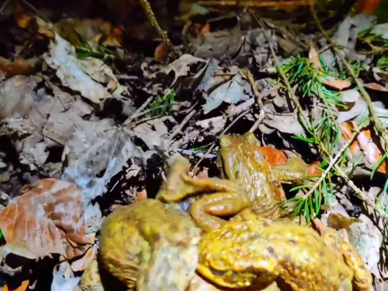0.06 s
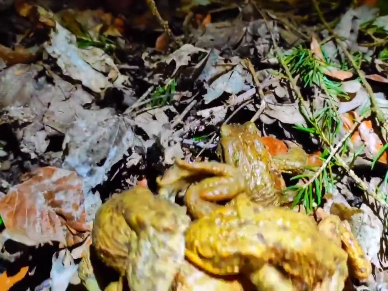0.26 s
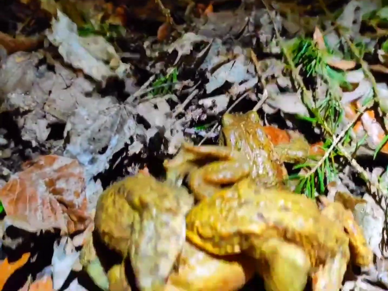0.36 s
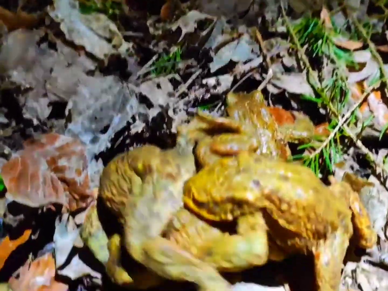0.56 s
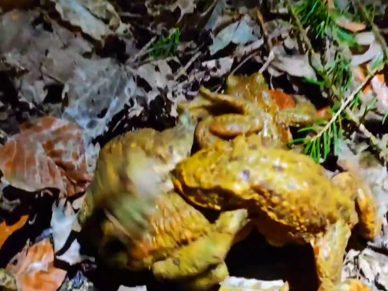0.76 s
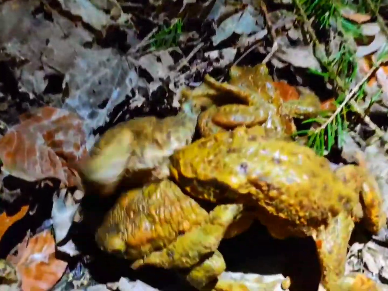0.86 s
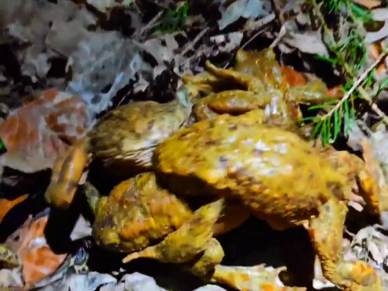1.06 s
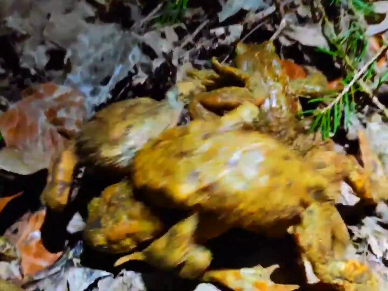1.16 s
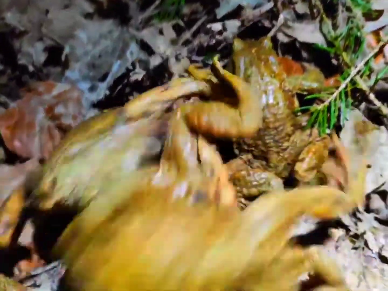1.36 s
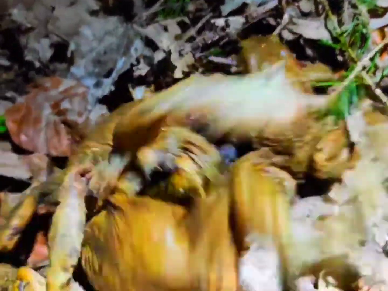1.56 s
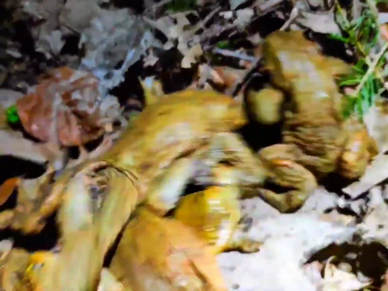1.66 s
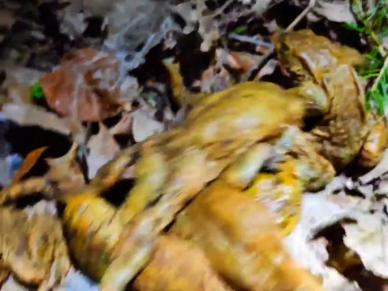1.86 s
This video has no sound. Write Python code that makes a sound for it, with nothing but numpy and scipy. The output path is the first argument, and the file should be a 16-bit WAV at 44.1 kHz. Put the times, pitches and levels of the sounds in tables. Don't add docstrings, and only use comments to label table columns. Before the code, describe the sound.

Close stereo phone pickup on a quiet night forest floor: sparse leaf cracks, low thumps and a sharp pop on the right, light rustling, then vigorous leaf scrambling with a single brief toad peep.

```python
import sys
import numpy as np
from scipy import signal
from scipy.fft import rfft, irfft, next_fast_len
from scipy.io import wavfile
from scipy.ndimage import uniform_filter1d, map_coordinates

SR = 44100
rng = np.random.default_rng(int(sys.argv[2]) if len(sys.argv) > 2 else 0)


def amplitude_ratio(level_db):
    exponent = np.asarray(level_db, float) / 20
    return 10 ** exponent


def unload_audio(sound):
    columns = np.transpose(np.atleast_2d(sound))
    steps = np.round(np.clip(columns, -1, 1) * 32767)
    wavfile.write(sys.argv[1], SR, steps.astype(np.int16))


N = 85995


def unit(x):
    return x / np.sqrt(np.mean(x ** 2) + 1e-20)


def along(points, hz):
    f, v = np.transpose(points)
    return np.interp(np.log(hz + 1), np.log(f + 1), v)


def curve(points):
    s, v = np.transpose(points)
    return np.interp(np.arange(N) / SR, s, v)


def wobble(rate_hz):
    knots = rng.standard_normal(int(N * rate_hz / SR) + 4)
    return map_coordinates(knots, [np.arange(N) * rate_hz / SR])


def filtered(x, response):
    m = next_fast_len(N + SR // 2)
    return irfft(rfft(x, m) * response(np.fft.rfftfreq(m, 1 / SR)), m)[..., :N]


def spread(pair, spectrum, alike):
    def mid_side(hz):
        turn = np.arccos(np.clip(along(alike, hz), -1, 1)) / 2
        return amplitude_ratio(along(spectrum, hz)) * [np.cos(turn), np.sin(turn)]
    mid, side = filtered(pair, mid_side)
    return unit(np.array([mid + side, mid - side]))


def sides(pan_db):
    return amplitude_ratio(np.array([pan_db / 2, -pan_db / 2]))


def step_up(t, at_s, rise_s):
    return (1 + np.tanh((t - at_s) / rise_s)) / 2


# (frequency [Hz], density [dB per Hz])
AIR_SPECTRUM = [(8.8, -2.5), (20, -8.5), (40, -3), (75, -11.5), (150, -21.5), (334, -26), (600, -36),
                (780, -47.5), (1320, -120)]
# (frequency [Hz], likeness [0..1])
AIR_ALIKE = [(20, .25), (35, .9), (100, .6), (300, .5), (640, 0.2), (3000, .02)]
# (time [s], level [dB])
AIR_SWELL = [
    (0, 0),
    (.15, 2),
    (.5, 0),
    (.9, 1),
    (1.1, -0.5),
    (1.35, -1),
    (1.6, -4),
    (1.8, -0.5),
    (1.95, 0.5),
]
# (frequency [Hz], density [dB per Hz])
HISS_SPECTRUM = [(250, -3), (700, -1), (1500, -9.5), (4000, -14.5), (8000, -10.5), (10300, -20.5),
                 (13000, -15), (15800, -14.5)]
AIR_DB, HISS_DB = -49, -62


def night():
    gusts = rng.standard_normal((2, N)) * amplitude_ratio(1.4 * wobble(6.17))
    air = spread(gusts, AIR_SPECTRUM, AIR_ALIKE)
    hiss_alike = [(300, 0.19), (2000, 0.0091), (8000, 0.49)]
    hiss = spread(rng.standard_normal((2, N)), HISS_SPECTRUM, hiss_alike)
    return amplitude_ratio(AIR_DB + curve(AIR_SWELL)) * air + amplitude_ratio(HISS_DB) * hiss


# (frequency [Hz], level [dB])
PORT = [(4500, -22.5), (6000, -17.5), (7000, -4.5), (8350, 0.7), (9200, -9.5), (10500, -23.5)]
# (frequency [Hz], density [dB per Hz])
LEAF = [(200, -4.5), (400, -6), (1200, -5.5), (3000, -4.5), (5500, -1), (10000, -7.5), (13000, -4),
        (15800, -8.5)]
# (time [s], peak [dB], broad part [dB], left-right [dB])
SNAPS = [(0.0833, -46.5, -7, 16.0), (0.1222, -47, -6, 16.0), (0.1528, -48.5, -8, 16.5),
         (0.1733, -46.5, -7.5, 15.0), (0.2887, -44.5, -5, 19.0), (0.413, -36.5, -10.5, 8),
         (0.458, -53, -6, 1), (0.618, -41.5, -8, -6.5), (0.6389, -31.5, -18, -13), (0.7414, -36, -12, -2),
         (0.7896, -36.5, -5, 1), (0.828, -50, -0.5, 11), (0.9488, -46.5, -26, -11),
         (1.0321, -43.5, -9.5, -3), (1.0939, -31.5, -14.5, 1), (1.1728, -30, -12, -13),
         (1.2307, -24, -31, -6.5), (1.2364, -20, -21, 6), (1.3125, -33, -4, -8), (1.3877, -25, -24, -13),
         (1.423, -46, -15, -12), (1.4875, -21.5, -16, -4.5), (1.5733, -26, -20, -2.0),
         (1.6202, -26, -21, 9), (1.6384, -22, -30, 9), (1.8023, -45, -7, -11.5), (1.8196, -25.5, -12, -4),
         (1.8579, -26.5, -30, 0), (1.924, -22, -25, 16)]
# (time [s], peak [dB], left-right [dB])
MORE_SNAPS = [(0.4695, -47, -6.5), (0.526, -49, -5.0), (0.583, -45, -5.0), (0.623, -38, -4.5),
              (0.841, -41.5, -6), (0.8644, -52, 0.0), (0.8859, -45.5, -1.5), (0.9286, -53, -9),
              (1.0114, -52, -2.0), (1.1168, -38, -2.0), (1.1785, -29.5, -11), (1.207, -32, -10),
              (1.2115, -30, -5.5), (1.2444, -26, 3), (1.4451, -40, -13), (1.4592, -23.5, -3), (1.5232, -32, 0.0),
              (1.5579, -30, -3.5), (1.5824, -27, -2.0), (1.597, -28, 2), (1.6052, -32, 2), (1.6127, -31, 4),
              (1.6314, -23.5, 5), (1.6835, -28, 5), (1.747, -36, -0.5), (1.87, -34, -1.0), (1.884, -29, 0.0),
              (1.919, -27, 3.5), (1.9273, -28, 2.5)]
# (time [s], level [dB], pitch [Hz], left-right [dB])
THUDS = [(0.1247, -46.5, 1050, 9), (.173, -50.5, 950, 9), (0.4599, -42, 6500, -11),
         (0.49, -48, 2140, -19.5), (0.506, -53.5, 2250, -16), (.757, -54.5, 1680, -17),
         (1.423, -36.5, 4500, 9), (1.489, -45.5, 398, -1), (1.6, -42, 1590, -14), (1.64, -40.5, 1280, -10),
         (1.769, -45, 2680, -18), (1.803, -48, 1820, -2)]
MORE_SNAPS_BROAD_DB = -19
SNAP_T60_S, SNAP_RISE_S = .008, .001
THUD_CYCLES, THUD_LEAST_S = 1, .0002


def snaps():
    t = np.arange(SR // 20) / SR
    whistle, broad, thuds = np.zeros((3, 2, N + SR))
    cracks = [*SNAPS, *[(s, db, MORE_SNAPS_BROAD_DB, pan_db) for s, db, pan_db in MORE_SNAPS]]
    noises = rng.standard_normal((len(cracks), 4, len(t)))
    burst = amplitude_ratio(-60 * t / SNAP_T60_S) * (1 - np.exp(-t / SNAP_RISE_S))
    for (s, db, broad_db, pan_db), noise in zip(cracks, noises):
        shape = amplitude_ratio(db) * burst * sides(np.clip(pan_db, -10, 10))[:, None]
        span = slice(round(s * SR), round(s * SR) + len(t))
        whistle[:, span] += shape * (noise[0] + 0.12 * noise[1:3])
        broad[:, span] += shape * amplitude_ratio(broad_db) * (noise[3] + noise[1:3])
    for s, db, hz, pan_db in THUDS:
        u = t / max(THUD_CYCLES / hz / 2, THUD_LEAST_S)
        ring = np.e * u * np.exp(-u) * np.sin(2 * np.pi * hz * t)
        span = slice(round(s * SR), round(s * SR) + len(t))
        thuds[:, span] += amplitude_ratio(db) * ring * sides(pan_db)[:, None]
    whistle = filtered(whistle[:, :N], lambda hz: amplitude_ratio(along(PORT, hz) + 11))
    broad = filtered(broad[:, :N], lambda hz: amplitude_ratio(along(LEAF, hz) + 12) * hz ** 2 / (hz ** 2 + 1500 ** 2))
    return whistle + broad + thuds[:, :N]


# (time [s], level [dB], rebound [Hz])
JERKS = [
    (.207, -36, 120),
    (.2225, -32, 170),
    (.2285, -29, 80),
    (.2685, -26.5, 100),
]
JERK_GROWS_S, JERK_DIES_S, JERK_SWELL = .009, .008, .6


def jerks():
    out = np.zeros(N)
    for s, db, hz in JERKS:
        u = np.arange(N) / SR - s
        after_s = np.clip(u, 0, None)
        late = after_s / JERK_DIES_S
        envelope = np.exp(np.clip(u, None, 0) / JERK_GROWS_S - late)
        rebound = np.e * JERK_SWELL * late - np.cos(2 * np.pi * hz * after_s)
        out += amplitude_ratio(db) * envelope * rebound
    return out


# (time [s], level [dB])
DRAG = [
    (.17, -58),
    (.205, -44),
    (.232, -42),
    (.29, -44),
    (.36, -41),
    (.43, -42),
    (.47, -60),
]
# (time [s], level [dB], rise [s])
SLIPS = [
    (.3318, -16, .0008),
    (.3361, -17, .0006),
    (.3395, -9.3, .0005),
]
# (time [s], level [dB], half width [s])
POPS = [(.33907, -.7, .00013), (.33891, -8.5, .00006), (.3388, -18, .0004), (.3331, -28, .0003),
        (.3345, -25, .001), (.3354, -26, .0002), (.348, -24, .00009), (.3487, -30, .00015),
        (.36055, -26, .00008), (.3641, -16.5, .00008), (.3684, -35, .00008)]
DRAG_HZ, SEALED_HZ = 80.6, 8500
PULL_S, PULL_DB, PULL_GROWS_S, LEAK_S = .3305, -12.6, .0065, .007
POP_POINT = 1.8
PEEL_S, PEEL_DB, PEEL_T60_S, PEEL_HZ = .347, -47, .2, 5500


def finger():
    t = np.arange(N) / SR

    def leak(s):
        return np.exp(-np.clip(t - s, 0, None) / LEAK_S)

    rub = filtered(rng.standard_normal(N), lambda hz: hz / (hz + 26) / (1 + (hz / DRAG_HZ) ** 3))
    drag = amplitude_ratio(curve(DRAG)) * unit(rub)
    pull = -amplitude_ratio(PULL_DB) * np.exp(-np.clip(PULL_S - t, 0, None) / PULL_GROWS_S) * leak(PULL_S)
    slips = sum(amplitude_ratio(db) * step_up(t, s, rise_s) * leak(s) for s, db, rise_s in SLIPS)
    pops = sum(-amplitude_ratio(db) * np.exp(-(np.abs(t - s) / half_s) ** POP_POINT) for s, db, half_s in POPS)
    rough = rng.standard_normal(N) * amplitude_ratio(3 * wobble(600))
    skin = unit(filtered(rough, lambda hz: hz / (hz + 300) / (1 + (hz / PEEL_HZ) ** 4)))
    t60_s = np.where(t > PEEL_S, PEEL_T60_S, PEEL_T60_S / 15)
    peel = amplitude_ratio(PEEL_DB - 60 * np.abs(t - PEEL_S) / t60_s) * skin
    pressure = drag + jerks() + pull + slips + pops + peel
    right = filtered(pressure, lambda hz: 1 / (1 + (hz / SEALED_HZ) ** 6))
    return np.array([np.zeros(N), right])


PATCH_DB = 2


def patchy(pair):
    z = signal.stft(pair, nperseg=256)[2]
    field = uniform_filter1d(rng.standard_normal(z.shape[1:]), size=7, axis=0)
    field = uniform_filter1d(field, size=7, axis=1)
    return signal.istft(z * amplitude_ratio(PATCH_DB * unit(field)), nperseg=256)[1][:, :N]


GRAINS_PER_S, GRAIN_HZ, GRAIN_CYCLES, GRAIN_SPREAD_DB = 1600, 8000, 2.5, 3.2


def crackle():
    at, side, u = rng.random((int(GRAINS_PER_S * N / SR), 3)).T
    hz = np.clip(GRAIN_HZ * np.exp(0.456 * rng.standard_normal(len(at))), 600, 15000)[:, None]
    t = np.arange(SR // 200) / SR
    size = amplitude_ratio(-GRAIN_SPREAD_DB * np.log(u + 1 / 50) + along(PORT, hz[:, 0]) / 2)[:, None]
    decay = np.exp(-t * hz / GRAIN_CYCLES) * (1 - np.exp(-t * hz))
    ring = size * np.sin(2 * np.pi * hz * t) * decay
    where = ((at * N).astype(int)[:, None] + np.arange(len(t))).ravel()
    gains = sides(20 * (side - .5))
    return unit(np.array([np.bincount(where, (ring * g[:, None]).ravel(), N + SR)[:N] for g in gains]))


# (time [s], length [s], level [dB], broad part [dB], left-right [dB])
SHOVES = [(0.328, 0.09, -68.5, 3, -8), (0.486, 0.044, -63.5, 5.5, -8), (0.536, 0.038, -66.5, 2, -2),
          (0.567, 0.037, -61, 1, -7), (0.619, 0.031, -57, 2.5, -6), (0.65, .032, -55.5, 2.5, -3),
          (0.696, 0.053, -69.5, 7.5, -3), (0.743, 0.025, -62, 6, -5), (0.773, 0.029, -60.5, 7, -4.5),
          (0.818, 0.027, -67.5, 6.5, -4), (0.862, 0.045, -75, -6, -8), (0.997, 0.21, -69, 3.5, -4),
          (1.064, 0.086, -60, 3, -2.5), (1.17, 0.053, -44, -0.5, -2.5), (1.221, 0.018, -40, -8, -7.5),
          (1.237, 0.046, -56, 8, 0), (1.292, 0.027, -46.5, 1.5, -2.5), (1.33, 0.039, -47.5, 2, -3.5),
          (1.369, 0.06, -43, -3.5, -3.5), (1.438, 0.032, -43, 0, -1), (1.483, 0.049, -42, -1, -1),
          (1.544, 0.087, -46, -2, -3), (1.596, 0.053, -41, -3, -1), (1.655, 0.056, -46.5, -0.5, -3),
          (1.708, 0.075, -49.5, -1.5, 0), (1.799, 0.014, -51, -4, 0), (1.814, 0.013, -43.5, -4.5, -4),
          (1.832, 0.029, -49, -5.5, -2), (1.859, 0.039, -44.5, -3, -0.5), (1.909, 0.046, -46.5, -1, -4)]
# (frequency [Hz], likeness [0..1])
LEAF_ALIKE = [(600, 0.19), (3000, 0.028), (6500, 0.097), (10000, 0.85), (15000, 0.26)]
SHOVE_RISE_S, SHOVE_FALL_DB_PER_S = 0.0086, 483
LEAF_DB, GRAIN_DB, CLUMP_DB = -1, -8, 1


def rustle():
    t = np.arange(N) / SR
    whistle_power, broad_power = np.zeros((2, 2, N))
    for s, length_s, db, broad_db, pan_db in SHOVES:
        fall_db = SHOVE_FALL_DB_PER_S * np.clip(t - s - length_s, 0, None)
        shape = amplitude_ratio(db - fall_db) * np.clip((t - s) / SHOVE_RISE_S, 0, 1) * sides(pan_db)[:, None]
        whistle_power += shape ** 2
        broad_power += (shape * amplitude_ratio(broad_db)) ** 2

    def clumpy_hiss(depth_db):
        clumps_db = CLUMP_DB * np.array([wobble(150), wobble(110)])
        return rng.standard_normal((2, N)) * amplitude_ratio(depth_db * wobble(59.57) + clumps_db)

    ports = spread(patchy(clumpy_hiss(1.9)), PORT, [(8000, 0.84)])
    whistle = np.sqrt(whistle_power) * (ports + amplitude_ratio(GRAIN_DB) * crackle())
    broad = np.sqrt(broad_power) * spread(patchy(clumpy_hiss(1.5)), LEAF, LEAF_ALIKE)
    return amplitude_ratio(LEAF_DB) * (whistle + broad)


# (time [s], level [dB])
CHIRP = [
    (1.2545, -60),
    (1.258, -37),
    (1.262, -32),
    (1.276, -32.5),
    (1.308, -29.5),
    (1.355, -30),
    (1.39, -35),
    (1.422, -43),
    (1.433, -62),
]
# (multiple [1], level re fundamental [dB], fade [dB per s])
OVERTONES = [(2, -29, -15), (3, -29, 70), (4, -22, 140), (5, -38, 60), (6, -26, 60), (7, -30, 60)]
CHIRP_HZ, ONSET_HZ, SETTLE_S = 1003, 135, .015
LIFT_HZ, LIFT_S, LIFT_WIDE_S = 52, 1.392, .017
OVERTONES_S, OVERTONES_RISE_S = 1.263, .002
BRIGHTEN, TREMBLE = .1, .0025
CHIRP_DB, CHIRP_LAG_S = 1.3, .00017
TURN_DB, TURN_S, TURN_WIDE_S = 4, 1.39, .008


def chirp():
    t = np.arange(N) / SR
    db = curve(CHIRP)
    start_s, end_s = CHIRP[0][0], CHIRP[-1][0]
    since_s = np.clip(t - start_s, 0, None)
    hz = CHIRP_HZ + ONSET_HZ * np.exp(-since_s / SETTLE_S) + LIFT_HZ * step_up(t, LIFT_S, 2 * LIFT_WIDE_S)
    phase = 2 * np.pi * np.cumsum(hz * (1 + TREMBLE * wobble(100))) / SR
    over = np.zeros(N)
    for k, level_db, fade_db_per_s in OVERTONES:
        over += amplitude_ratio(level_db - fade_db_per_s * since_s + 3.3 * wobble(61.6)) * np.sin(k * phase)
    over *= amplitude_ratio(BRIGHTEN * (db - db.max())) * step_up(t, OVERTONES_S, OVERTONES_RISE_S)
    tone = np.sin(phase - 2 * np.pi * hz * [[CHIRP_LAG_S], [0]]) + over
    pan_db = TURN_DB / (1 + np.exp(-np.clip((t - TURN_S) / TURN_WIDE_S, -50, 50)))
    return np.sqrt(2) * amplitude_ratio(db + CHIRP_DB) * tone * (t > start_s) * (t < end_s) * sides(pan_db)


# (frequency [Hz], gain [dB])
COVERED = [(400, 0.5), (2000, -1.5), (4500, 1), (8000, -16), (12000, -1.5)]


def scene():
    left, right = night() + snaps() + rustle() + chirp()
    shut = np.arange(N) / SR < POPS[0][0]
    muffled = filtered(right, lambda hz: amplitude_ratio(along(COVERED, hz)))
    return np.array([left, np.where(shut, muffled, right)]) + finger()


def roll_off(x):
    return signal.sosfilt(signal.butter(12, 16810, fs=SR, output="sos"), x)


TOP_HZ = 15800


def record(dry):
    mix = filtered(dry, lambda hz: np.clip((TOP_HZ + 100 - hz) / 200, .011, 1))
    return roll_off(mix)


dry = scene()
out = record(dry)
unload_audio(out)
```